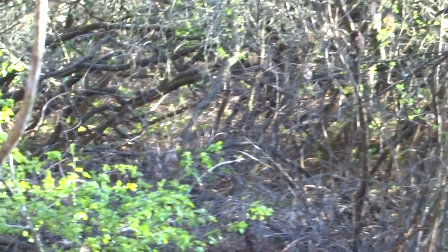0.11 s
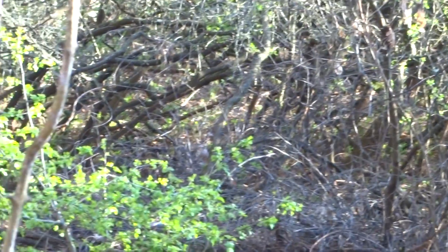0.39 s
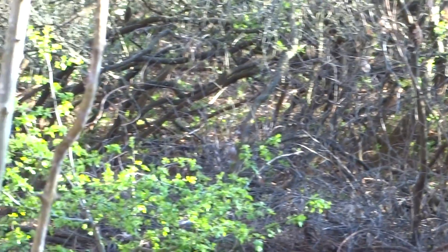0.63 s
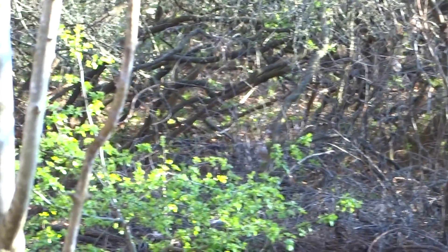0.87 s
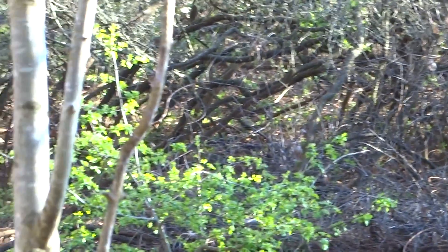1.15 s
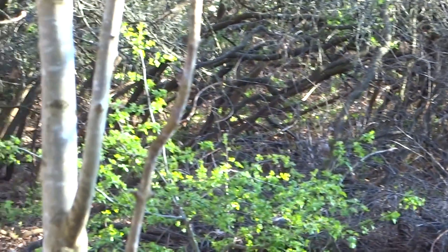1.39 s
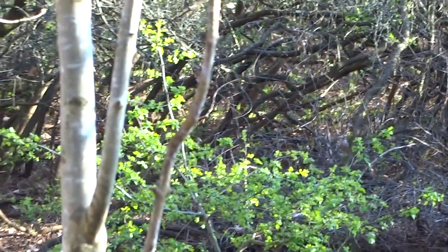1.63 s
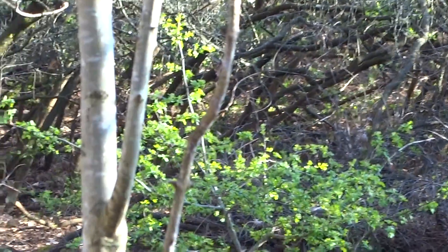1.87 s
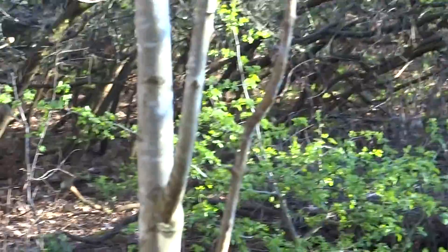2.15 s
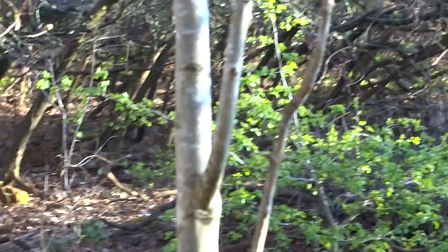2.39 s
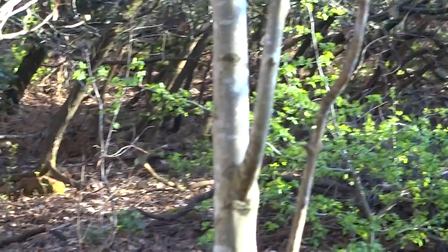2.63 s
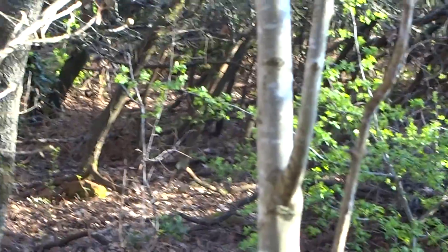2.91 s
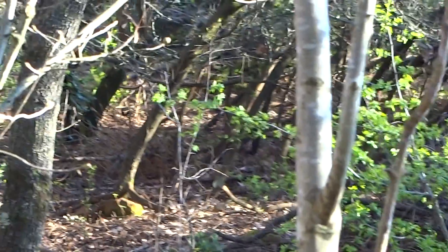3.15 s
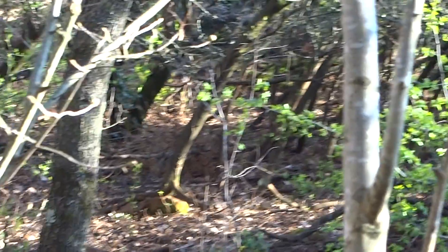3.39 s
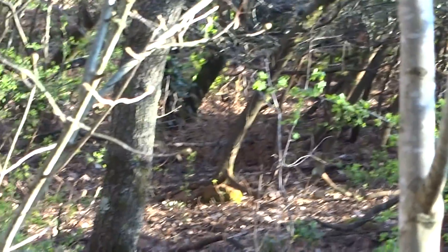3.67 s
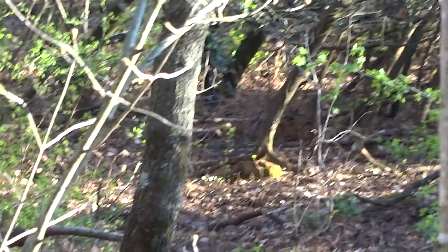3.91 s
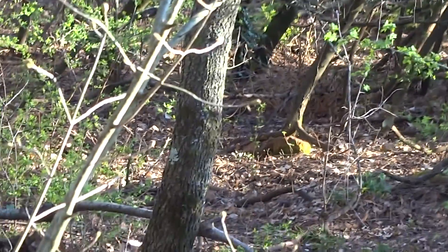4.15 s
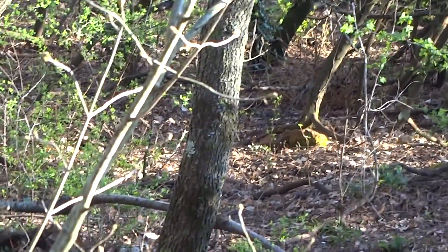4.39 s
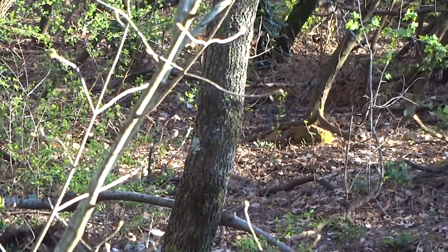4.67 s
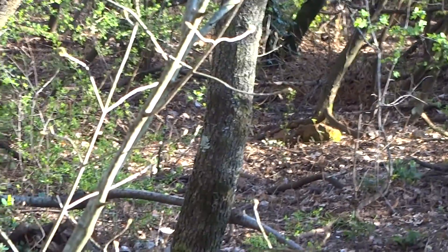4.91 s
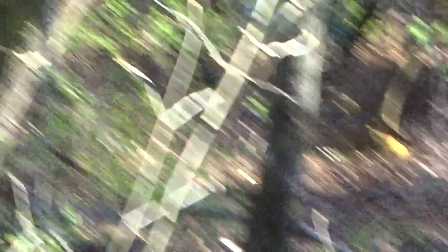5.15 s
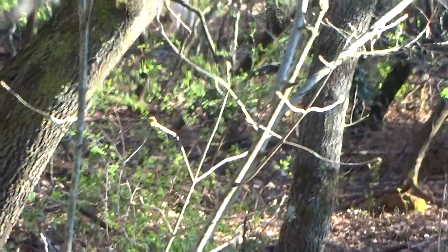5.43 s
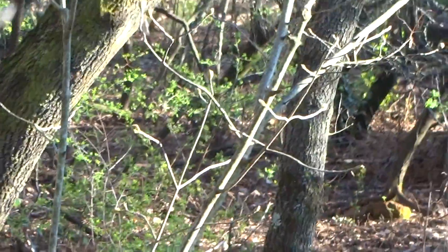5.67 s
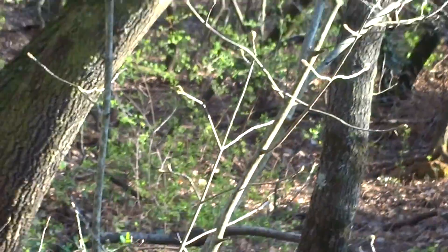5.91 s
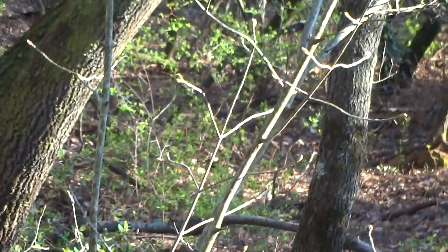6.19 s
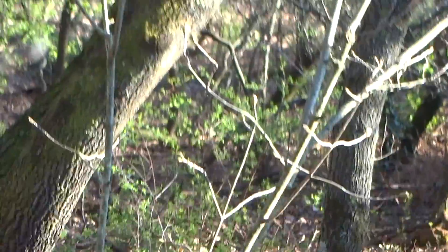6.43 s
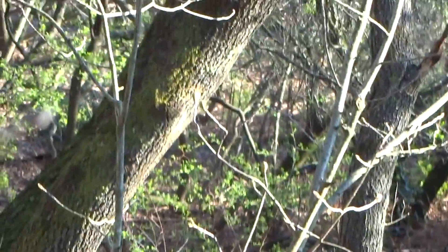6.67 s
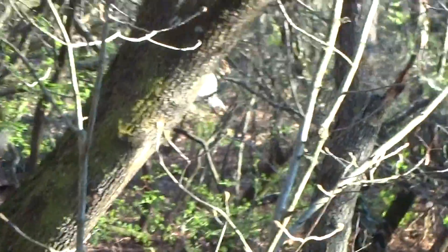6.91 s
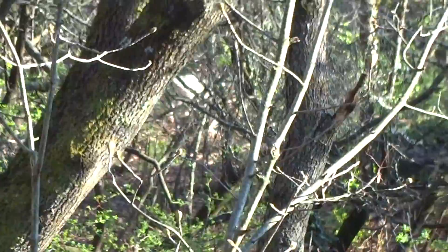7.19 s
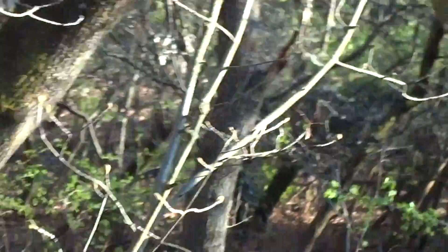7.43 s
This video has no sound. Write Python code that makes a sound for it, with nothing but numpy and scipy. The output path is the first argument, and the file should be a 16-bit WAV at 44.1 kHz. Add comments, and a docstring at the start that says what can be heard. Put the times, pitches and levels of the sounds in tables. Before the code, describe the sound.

Outdoors in a wood, a hoarse hound is already barking at the start: short, raspy barks rising slightly in pitch, roughly every 0.35 seconds until 3.1, each with a brief scattered echo from the trunks. A clearer, nearer yelp breaks in at 0.6 and 1.1. Faint high birds whistle around 1.4 to 2.1 and 3.6 to 4.8. Twigs snap sharply near 1.5 and 3.3, with more small cracks up to 6. After a very faint bark at 3.5, barks come at 3.8, 4.2, 4.8, 5.5 and 6.1, the last ones lower. A loud yelp comes at 5.1, then several from 6.2 to 7.2, while a high, unsteady howl in two breaths drops to a groan at 6.25 to 6.8. A rising low note swells at the end, about 7.5. Leaf rustle grows after 5; wind rumbles and thuds buffet the handheld microphone, strongest near 5 and 6.5, over steady soft noise and a thin whine.

```python
"""A hoarse hound is heard first, barking in a steady rhythm; a nearer one yelps with a break in its voice
and a third howls once. Each voice is a buzz of overtones, breath and rasp shaped by a throat; one high
overtone of the howl is a sine of its own. Tree trunks scatter the voices into a short tail of fading noise,
and small birds whistle gliding sines. Twigs snap and leaves rustle near a hand-held camera as bursts and
bands of noise; bumps thud on its body, wind rumbles on its microphone, over soft noise and a thin whine."""
import sys
import numpy as np
from scipy import signal
from scipy.fft import rfft, irfft, next_fast_len
from scipy.io import wavfile

SR = 44100
rng = np.random.default_rng(int(sys.argv[2]) if len(sys.argv) > 2 else 0)


def output_pcm(signal):
    """Save a mono or channel-first signal as 16-bit PCM at the path in sys.argv[1].

    Samples are clipped to [-1, 1] before scaling.
    """
    pcm = np.clip(np.atleast_2d(signal).T, -1, 1) * 32767
    wavfile.write(sys.argv[1], SR, np.round(pcm).astype(np.int16))


def gain_from_db(level_db):
    """Turn a decibel level (scalar or array-like) into a linear amplitude factor."""
    decades = np.asarray(level_db, float) / 20
    return 10 ** decades


N = 333396   # length in samples

# All call levels below are set before the mix in scene().
# hoarse barks: start t/s, length t/s, peak level/dB, top pitch f/Hz, brightness/dB per octave
BARKS = [(-0.07, 0.12, -29.5, 528, -0.5), (0.147, 0.13, -40, 529, -6), (0.263, 0.14, -26.5, 560, 0),
         (0.663, .12, -25, 554, 2), (1.016, 0.13, -24, 540, 1), (1.368, .11, -24, 552.7, 1),
         (1.709, .12, -23.5, 550, 1), (2.072, 0.12, -25.5, 543.4, 1), (2.429, .12, -25, 543.2, 0.5),
         (2.778, .12, -25, 544.5, 0), (3.12, 0.13, -25.5, 547, -0.5), (3.532, .1, -42.5, 511, -4),
         (3.806, .12, -23.5, 526, 3), (4.171, .135, -24.5, 522.5, 2.5), (4.812, .125, -24, 530.4, 1),
         (5.522, .1, -26, 435, 4), (6.103, 0.098, -27.5, 454, 1.5)]
# course of every bark: share of length, share of top pitch, level/dB re peak,
# extra brightness/dB per octave, share of its roughness
BARK_COURSE = [(0, .66, -18, -3, .4), (.27, .82, -1, 1, .6), (.45, .93, -3, 0, .85), (.63, 1.0, 0, 0, 1.0),
               (1, .96, -12, 0, 1.1)]
# how hoarse each bark is: roughness/0-1
BARK_ROUGHNESS = [.28, .12, .26, .28, .24, .28, .24, .26, .25, .24, .2, .2, .25, .26, .24, .28, .28]
# clear cries of the yelps: start t/s, length t/s, peak level/dB, first f/Hz, last f/Hz, brightness/dB per octave
CRIES = [(0.632, 0.079, -18.5, 776, 670, -6.5), (1.088, 0.13, -25, 791, 691, -1),
         (5.101, 0.1, -16.5, 775.5, 700, -4.5), (6.183, 0.1, -17, 785.3, 682, -2),
         (6.391, .115, -15, 790.5, 673.4, -0.5), (6.777, 0.11, -16, 741, 665, -2),
         (7.151, 0.11, -16, 752, 664, -0.5)]
# course of every cry: share of length, share of pitch fall, level/dB re peak, roughness/0-1
CRY_COURSE = [(0, 0, -5, .06), (.35, .13, 0, .06), (.67, .5, -3, .11), (1, 1, -10, .18)]
# low lead-ins, mouth half shut: end t/s, length t/s, last level/dB, first f/Hz, last f/Hz, brightness/dB per octave
LEAD_INS = [(.65, .095, -27.5, 405.4, 606, -3), (5.118, .063, -15, 658, 672.5, -7),
            (6.2, .075, -18.5, 616.5, 678, 2), (6.788, .058, -10, 528.5, 639, 0.5),
            (7.164, .085, -18, 381.5, 601.7, 3.5), (7.6, 0.14, -16.5, 376, 652, 2.5)]
# howl in two breaths, then a falling groan: t/s, pitch f/Hz, level/dB, brightness/dB per octave, roughness/0-1
HOWL = [
    [(6.25, 1007, -19.5, 14, 0.31), (6.29, 1100, -14, -6.5, 0.08), (6.33, 1210, -12.5, -6.5, 0.22),
     (6.4, 1184, -25.5, 1.5, 0.33), (6.47, 1170, -35, -4, 0.54), (6.52, 1182, -13, -6, 0.31),
     (6.61, 1150, -32, -0.5, .3)],
    [(6.63, 983, -14.5, -9, 0.19), (6.665, 1126, -22.5, 7.5, 0.29), (6.78, 1185, -34, 5.5, 0.06)],
    [(6.7, 998, -27, -4, 0.35), (6.72, 781, -20.5, -12, 0.54), (6.75, 450, -31, -12, .3)],
]
# throat and mouth resonances: f/Hz, width/Hz (9 dB down at its edges), level/dB
HOARSE_THROAT = [(540, 50, -15.5), (1138, 964, 6), (1460, 650, 2), (2113, 1020, -6), (2558, 630, -8.5),
                 (4960, 2000, -31.5), (8200, 6300, -50)]
CLEAR_THROAT = [(724, 212, 1.5), (1466, 570, 2), (2436, 790, -13), (2676, 400, -20), (4950, 3360, -30),
                (7300, 12000, -49.5)]
HALF_SHUT_THROAT = [(560, 540, -6.5), (1150, 1030, 0.5), (1780, 400, 2), (2350, 400, -7), (2816, 480, -6.5),
                    (5070, 4200, -37), (7300, 4600, -44.5)]
# how long echoes among the trunks take to fade by 60 dB: f/Hz, t/s
WOOD_T60 = [(500, 0.51), (1000, 0.59), (2000, 0.54), (4000, 0.58), (8000, 0.56)]
# gliding sines, birds except for the last row: start t/s, length t/s, first f/Hz, last f/Hz, level/dB
GLIDES = [(1.35, 0.089, 9300, 9000, -79), (1.44, 0.047, 9060, 9400, -72), (1.492, 0.076, 10300, 9000, -74),
          (1.57, .05, 9400, 10250, -75), (1.605, 0.15, 10250, 9350, -76.5), (1.76, .13, 9950, 9200, -77),
          (1.393, 0.057, 4660, 4700, -78), (2.018, .035, 6300, 4400, -77), (2.04, 0.068, 4400, 3880, -79.5),
          (2.09, .09, 3750, 3720, -80), (3.6, 0.23, 5580, 5720, -74.5), (3.625, 0.11, 4460, 4540, -64),
          (4.24, 0.31, 5530, 5620, -68), (4.442, 0.19, 5620, 5750, -75.5), (4.672, .13, 2456, 2540, -66.5),
          (4.79, 0.067, 2520, 2460, -61), (6.295, 0.19, 7220, 7300, -62)]
BIRD_WHISTLES = GLIDES[:-1]
HOWL_OVERTONE = GLIDES[-1:]   # a high overtone of the howl, same columns
# twig snaps close by: t/s, crack peak level/dB, body level/dB re crack, left minus right level/dB
SNAPS = [(1.4541, -32, 8, -8.5), (1.4877, -35, 5, -9), (3.2994, -45, -29, -13), (3.3177, -29, 10.5, -7),
         (3.5342, -55, 25.5, -6), (3.6358, -42.5, 6, -1), (3.678, -43, 9, -5), (3.7294, -63, 37, -4.5),
         (4.3194, -45, 3, 6), (4.9364, -44, 12, 3), (4.982, -47, 18.5, 6), (5.002, -40.5, 7, -8),
         (5.3906, -52.5, 10, 1), (5.4888, -32, 9.5, -5.5), (5.6727, -49.5, 23, 4), (5.805, -39, 6.5, -4),
         (5.8795, -37.5, -6, -5), (6.0313, -53.5, -2.5, -13)]
# bumps on the camera body: t/s, push level/dB before the ring's own gain
BUMPS = [(1.471, -39), (2.798, -45.5), (2.961, -36), (3.727, -34), (4.965, -36), (5.4, -36), (6.566, -24.5)]
# noise colours, of which only the shape counts: f/Hz, level/dB per Hz
WIND_COLOUR = [(12, -33), (20, -1), (38, 5.5), (78, 0), (126, -7.5), (322, -24.5), (350, -17), (460, -52),
               (770, -120)]
RUSTLE_COLOUR = [(1500, -31.5), (3000, 3), (6000, -5), (10000, -8.5), (15000, -23)]
BACKGROUND_COLOUR = [(59, -39.5), (100, -1), (335, -1), (621, -1.5), (1060, 4.5), (1170, -10.5),
                     (1550, -6.5), (1830, 13.5), (2320, -11.5), (3700, -20), (9410, -27.5), (14700, -29),
                     (16000, -39)]
# wind on the microphone, and leaf rustle: t/s, level/dB
WIND_LEVEL = [(0.0, -63.5), (1.43, -62), (1.47, -51), (1.56, -62.5), (2.69, -58.5), (2.82, -43),
              (3.43, -60.5), (3.66, -52), (3.75, -36), (3.77, -48.5), (4.61, -61), (4.76, -47.5),
              (4.9, -48), (4.97, -32), (5.01, -43), (5.1, -34), (5.18, -47), (5.35, -46.5), (5.39, -35.5),
              (5.45, -42), (6.08, -63), (6.15, -38), (6.55, -36.5), (6.57, -30), (6.95, -61), (7.56, -55.5)]
RUSTLE_LEVEL = [(0.0, -66), (0.95, -69.5), (1.47, -71), (1.66, -64), (1.85, -81), (2.8, -73.5), (4.21, -63),
                (4.57, -72), (4.86, -66.5), (5.05, -60.5), (5.24, -68), (5.52, -58), (5.71, -54),
                (5.85, -57), (6.13, -58), (6.38, -52), (6.53, -56), (6.76, -62.5), (6.89, -65),
                (7.12, -67.5), (7.35, -63), (7.56, -60)]
# how alike left and right noise are: f/Hz, likeness/0-1
LIKENESS = [(30, 0.98), (100, 0.69), (300, 0.21), (1000, 0.51), (4000, 0.098), (12000, 1)]


def rms_one(x):
    """Scale a sound to an average (rms) strength of 1."""
    return x / np.sqrt(np.mean(x ** 2) + 1e-20)


def at_hz(points, hz):
    """Read a curve between its points on a log-frequency axis."""
    f, value = np.transpose(points)
    return np.interp(np.log(hz), np.log(f), value)


def band(x, low_hz, high_hz):
    """Keep the sound between two frequencies (Butterworth band-pass)."""
    return signal.sosfilt(signal.butter(2, [low_hz, high_hz], "band", fs=SR, output="sos"), x)


def drift(rate_hz, size):
    """Random wandering of rms 1: white noise smoothed twice, faster for a higher rate."""
    r = np.exp(-2 * np.pi * rate_hz / SR)
    warm_up = 4000   # samples thrown away while the filter settles
    noise = rng.standard_normal(size + warm_up)
    return rms_one(signal.lfilter([1], [1, -2 * r, r * r], noise)[warm_up:])


def unfold(rows, rise_s, fall_s):
    """First sample, columns drawn out per sample, and a soft on-off ramp for one call."""
    s, *columns = np.transpose(rows)
    start = max(round(s[0] * SR), 0)
    t = np.arange(start, min(round(s[-1] * SR), N)) / SR
    ramp = np.clip(np.minimum((t - s[0]) / rise_s, (s[-1] - t) / fall_s), 0, 1)
    return start, [np.interp(t, s, c) for c in columns], np.sin(ramp * np.pi / 2) ** 2


def throat_gain(throat, hz):
    """Throat resonances boost some overtones; a small mouth radiates no bass."""
    mouth_cut_hz = 518
    power = sum(gain_from_db(2 * db) / (1 + ((hz - f) / (width / 2)) ** 2) ** 3 for f, width, db in throat)
    return np.sqrt(power * hz ** 8 / (hz ** 8 + mouth_cut_hz ** 8))


def voice(calls, throat, slip_rad, wobble_hz, breath_db, half_db, blur_hz, rasp_db=1.0):
    """Uneven vocal-fold cycles on a gliding pitch, with half-pitch lines and breath, sent through the throat."""
    folds = np.zeros(N)
    for rows in calls:
        start, (hz, db, bright, rough), ramp = unfold(rows, rise_s=0.016, fall_s=0.02)
        rough, size = np.clip(rough, 0, 1), len(hz)
        phase = 2 * np.pi * np.cumsum(hz) / SR
        # overtones sit at 1/2, 1, 3/2, 2 .. times the pitch
        orders = np.arange(1, int(22000 / hz.max()) + 1)[:, None] / 2
        slip = slip_rad * rough * orders * drift(wobble_hz, size)   # cycles come early or late
        gains = gain_from_db(bright * np.log2(orders * hz / 1000))
        # strong and weak cycles alternate, which sounds the half-pitch lines
        gains = gains * np.where(orders % 1, gain_from_db(half_db) * rough, 1)
        heard = gains * throat_gain(throat, orders * hz)
        loudness = np.sqrt(np.sum(heard ** 2, axis=0) / 2)
        # overtones above blur_hz weaken to 55 %, where rasp joins them
        gains = gains * np.maximum(np.exp(-(orders * hz / blur_hz) ** 4), 0.55)
        shimmer = np.sqrt(1 - rough ** 2) + rough * drift(wobble_hz, size)
        offsets = rng.uniform(0, 2 * np.pi, orders.shape)
        tone = np.sum(gains * np.sin(orders * phase + slip + offsets), axis=0)
        puffs = rng.standard_normal(size) * (1 + np.cos(phase))   # air escapes once a cycle
        breath = gain_from_db(breath_db) * rough * puffs
        rasp = band(puffs, blur_hz, 16000) * gain_from_db(rasp_db + 2 * bright)
        source = shimmer * tone + breath + rasp
        # dividing by the expected loudness stops pitch and brightness from changing the level
        folds[start:start + size] += ramp * gain_from_db(db) * source / loudness
    size = next_fast_len(N + 4096)
    bins_hz = np.arange(size // 2 + 1) * SR / size
    return irfft(rfft(folds, size) * throat_gain(throat, bins_hz), size)[:N]


def barks():
    """Every bark swells while its pitch climbs, then reaches its top, roughens and fades."""
    calls = []
    for (s, length, db, hz, bright), rough in zip(BARKS, BARK_ROUGHNESS):
        calls.append([(s + part * length, share * hz, db + rel_db, bright + more, hoarse * rough)
                      for part, share, rel_db, more, hoarse in BARK_COURSE])
    return voice(calls, HOARSE_THROAT, slip_rad=1.15, wobble_hz=120, breath_db=8, half_db=-8, blur_hz=3200)


def cries():
    """The voice breaks up into a clear high note that sags and roughens as the breath runs out."""
    calls = []
    for s, length, db, high, low, bright in CRIES:
        calls.append([(s + part * length, high + fall * (low - high), db + rel_db, bright, rough)
                      for part, fall, rel_db, rough in CRY_COURSE])
    return voice(calls, CLEAR_THROAT, slip_rad=1.2, wobble_hz=100, breath_db=8, half_db=4, blur_hz=3600)


def lead_ins():
    """Most cries open with a low note that climbs and swells, the mouth half shut."""
    start_db, middle_db, rough = -28.5, -14, 0.14   # levels relative to the end of the note
    calls = []
    for s, length, db, first, last, bright in LEAD_INS:
        calls.append([(s - length, first, db + start_db, bright, rough),
                      (s - length / 2, (first + last) / 2, db + middle_db, bright, rough),
                      (s, last, db, bright, rough / 2)])
    return voice(calls, HALF_SHUT_THROAT, slip_rad=1.2, wobble_hz=100, breath_db=8, half_db=-4, blur_hz=3600)


def howl():
    """One howl in two breaths with a falling groan, its vocal folds slipping slowly and widely."""
    return voice(HOWL, HOARSE_THROAT, slip_rad=2.2, wobble_hz=40, breath_db=6, half_db=-12, blur_hz=8000)


def gliding_sines(rows):
    """Thin, slightly unsteady sines that glide and swell."""
    out = np.zeros(N)
    for s, length, first, last, db in rows:
        glide = [(s, first), (s + length, last)]
        start, (hz,), ramp = unfold(glide, 0.25 * length, 0.57 * length)
        size = len(hz)
        phase = 2 * np.pi * np.cumsum(hz * (1 + 0.0055 * drift(40, size))) / SR
        level = gain_from_db(db + 2 * drift(25, size))
        out[start:start + size] += ramp * level * np.sqrt(2) * np.sin(phase)
    return out


def howl_overtone():
    """One high overtone of the howl stands out as a sine."""
    return gliding_sines(HOWL_OVERTONE)


def trunks(onset_s=0.0078, side_db=-16, far_db=-20, far_stretch=1.77):
    """Echoes of many trunks: clumped noise that dies band by band, nearly alike on left and right."""
    clumps_db, clumps_hz = 3.0, 90   # unevenness of the echoes
    t = np.arange(SR) / SR
    white = rng.standard_normal((2, SR)) * gain_from_db(clumps_db * drift(clumps_hz, SR))
    tail = 0
    for hz, t60 in WOOD_T60:
        near = gain_from_db(-60 * t / t60)
        far = gain_from_db(far_db - 60 * t / t60 / far_stretch)   # far trees answer faintly and fade more slowly
        tail = tail + band(white, hz / np.sqrt(2), hz * np.sqrt(2)) * (near + far)
    tail = tail * np.clip(t / onset_s, 0, 1)
    mid, side = tail / np.sqrt(np.sum(tail[0] ** 2))
    return mid + gain_from_db(side_db) * side * np.array([[1], [-1]])


def wood(x):
    """Overlapping stretches each scatter off their own trunks, since the hounds move."""
    hop = round(0.5 * SR)   # other trunks answer after about half a second
    padded, out = np.pad(x, (hop, 2 * hop)), np.zeros((2, N + 3 * hop + SR))
    fade = np.sin(np.pi * np.arange(2 * hop) / (2 * hop))
    for i in range(0, N + hop, hop):
        stretch = padded[i:i + 2 * hop] * fade
        out[:, i:i + 2 * hop + SR - 1] += signal.fftconvolve(stretch[None], trunks(), axes=1)
    return out[:, hop:hop + N]


def birds():
    """Small birds whistle nearly pure tones."""
    return gliding_sines(BIRD_WHISTLES)


def snaps():
    """A short crack of bright noise with a duller woody body."""
    t = np.arange(2000) / SR
    out, decay = np.zeros((2, N + len(t))), gain_from_db(-60 * t / 0.011)   # noise falls 60 dB in 11 ms
    for s, db, body_db, pan_db in SNAPS:
        noise = rng.standard_normal((2, len(t)))
        crack = band(noise[0] * decay, 1800, 12000)
        body = band(noise[1] * decay, 1320, 2550)
        both = crack / np.abs(crack).max() + gain_from_db(body_db) * body / np.abs(body).max()
        sides_db = np.array([[pan_db], [-pan_db]]) / 2
        out[:, round(s * SR):][:, :len(t)] += gain_from_db(db + sides_db) * both
    return out[:, :N]


def thumps():
    """A soft push rings the camera housing at 90 Hz, falling 60 dB in 36 ms."""
    pushes = np.zeros(N)
    for s, db in BUMPS:
        pushes[round(s * SR)] = gain_from_db(db)
    t = np.arange(3000) / SR
    ring = 2.86 * np.sin(2 * np.pi * 90 * t) * gain_from_db(-60 * t / 0.036)
    return np.convolve(pushes, ring)[:N]


def banded_noise(colour, low_hz, count, patchy_db, patch_hz):
    """Half-octave bands of stereo noise with set levels, flicker and left-right likeness; overall rms 1."""
    out, together = 0, drift(patch_hz, N)
    # odd and even bands each share one noise and one flicker
    white, own = rng.standard_normal((2, 2, N)), [drift(patch_hz, N) for _ in range(2)]
    for k in range(count):
        low, high = low_hz * 2 ** (k / 2), min(low_hz * 2 ** (k / 2 + 0.5), 0.45 * SR)
        centre = np.sqrt(low * high)
        mid, side = band(white[k % 2], low, high)
        alike = np.clip(at_hz(LIKENESS, centre), 0, 1)
        flicker_db = patchy_db * (together + 1.76 * own[k % 2])
        stereo = np.sqrt(1 + alike) * mid + np.sqrt(1 - alike) * side * [[1], [-1]]
        out = out + gain_from_db(at_hz(colour, centre) + flicker_db) * stereo
    return rms_one(out)


def level_curve(points):
    """Turn a dB curve over time into a gain per sample."""
    return gain_from_db(np.interp(np.arange(N) / SR, *np.transpose(points)))


def rustle():
    """Leaf rustle: bright noise that flickers quickly and follows its level curve."""
    return level_curve(RUSTLE_LEVEL) * banded_noise(RUSTLE_COLOUR, 1400, count=7, patchy_db=2.0, patch_hz=40)


def wind():
    """Wind buffets the microphone: low noise that swells and dips with its level curve."""
    return level_curve(WIND_LEVEL) * banded_noise(WIND_COLOUR, 20, count=9, patchy_db=2.0, patch_hz=15)


def background():
    """A soft, almost steady noise from low to high frequencies."""
    return gain_from_db(-50.5) * banded_noise(BACKGROUND_COLOUR, 83.5, count=16, patchy_db=0.25, patch_hz=1.07)


def whine():
    """The camera's electronics whine as one steady 15625 Hz sine."""
    return gain_from_db(-75.5) * np.sqrt(2) * np.sin(2 * np.pi * 15625 * np.arange(N) / SR)


def scene():
    """Each hound has its own share of direct and scattered sound, and so have the thin sines."""
    barking, yelping, howling = barks(), cries() + lead_ins(), howl()
    sines = howl_overtone() + birds()
    direct = gain_from_db(-3.5) * barking + gain_from_db(2.0) * yelping + gain_from_db(-5.5) * howling + gain_from_db(9.5) * sines
    scattered = wood(gain_from_db(-2) * barking + gain_from_db(4) * yelping + gain_from_db(-4.5) * howling + sines / 3)
    animals = (direct + scattered) * gain_from_db(np.array([[0.25], [-0.25]]))   # a touch to the left
    return animals + snaps() + thumps() + rustle() + wind() + background() + whine()


def roll_off(x):
    """The treble ends steeply here."""
    return signal.sosfilt(signal.butter(12, 16490, fs=SR, output="sos"), x)


def record(dry):
    """Take the finished mix through its last step."""
    return roll_off(dry)


dry = scene()
out = record(dry)
output_pcm(out)
```